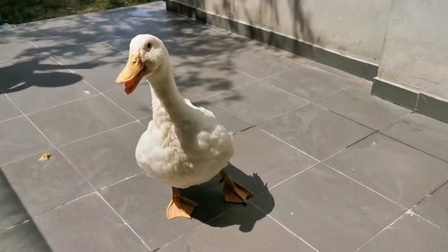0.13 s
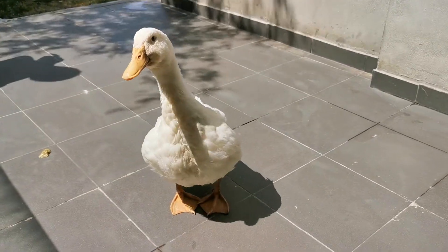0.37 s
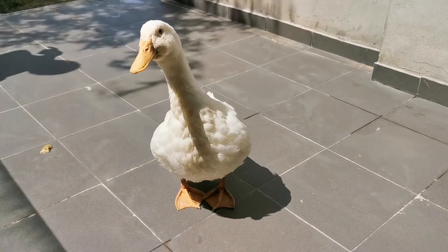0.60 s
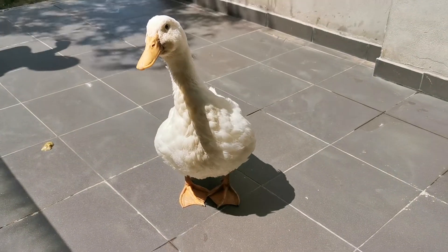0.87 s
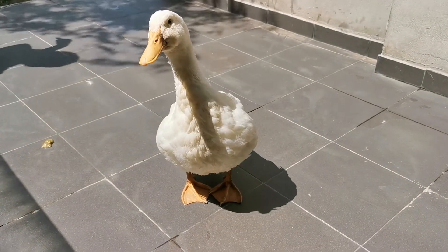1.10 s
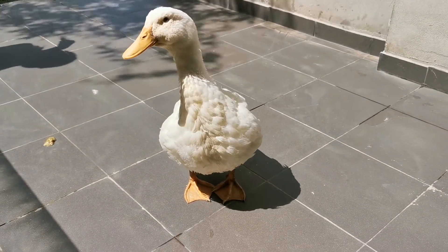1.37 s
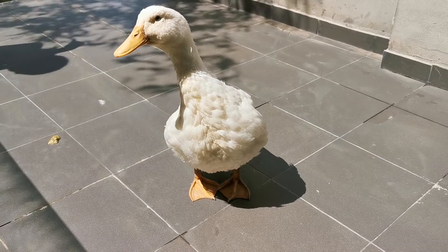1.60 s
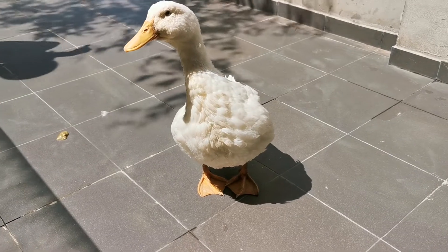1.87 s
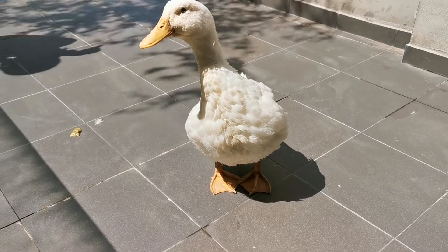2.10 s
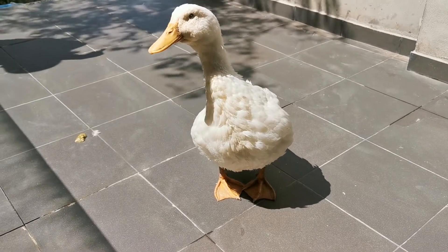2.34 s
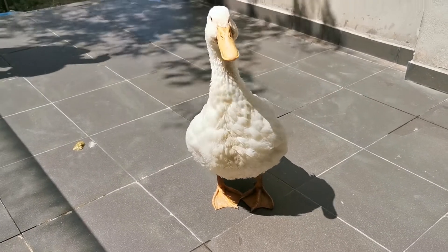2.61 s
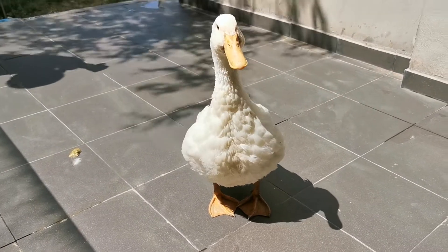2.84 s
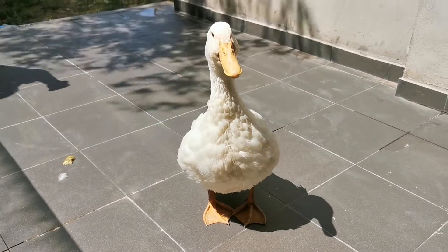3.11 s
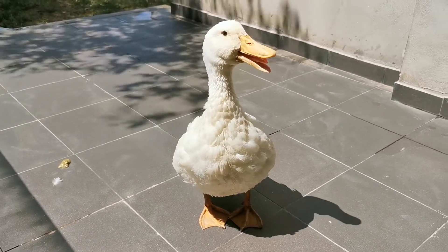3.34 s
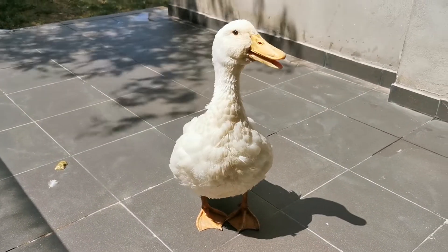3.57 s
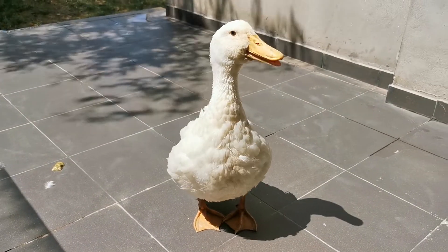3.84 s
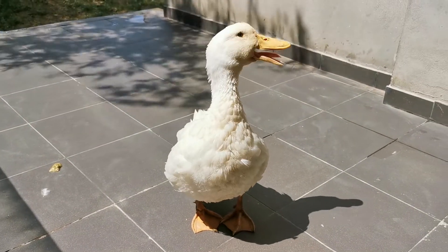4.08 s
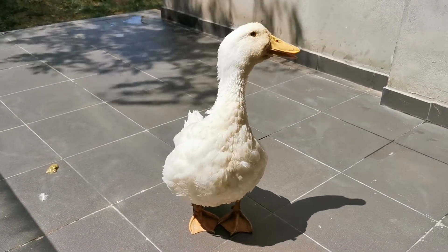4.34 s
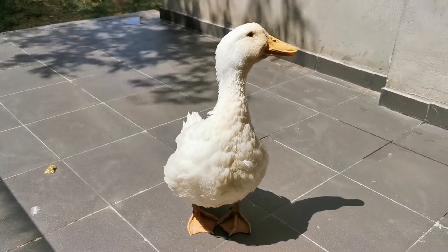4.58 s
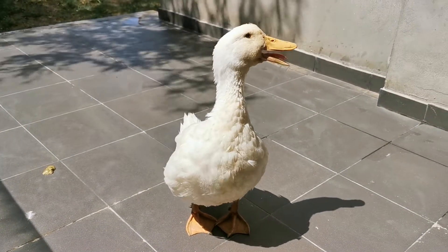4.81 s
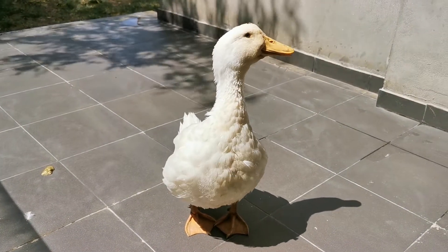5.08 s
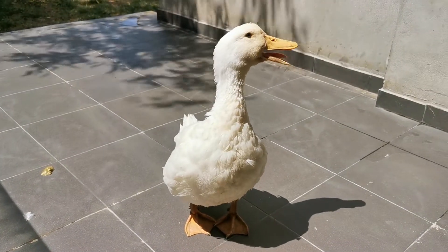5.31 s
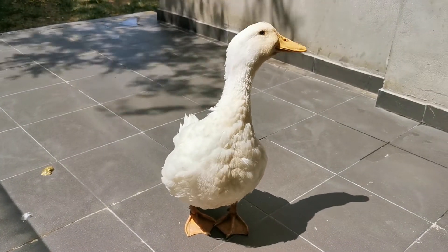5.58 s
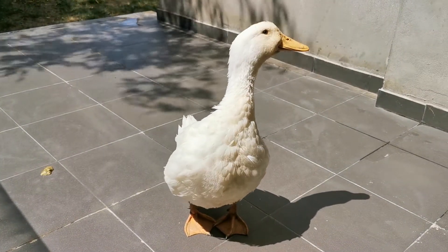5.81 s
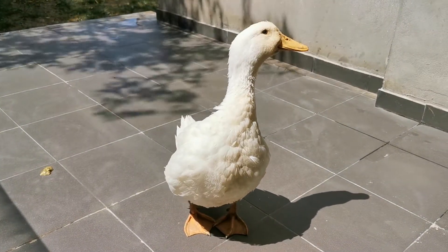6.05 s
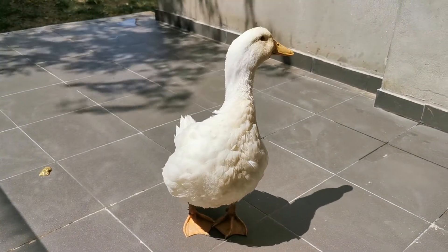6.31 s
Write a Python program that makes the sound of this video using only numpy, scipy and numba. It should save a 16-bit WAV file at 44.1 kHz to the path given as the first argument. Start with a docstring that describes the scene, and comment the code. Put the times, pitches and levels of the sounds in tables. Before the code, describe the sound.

Close on a sunny tiled terrace, a duck gives one loud, buzzy quack at once. Soft leaf hiss and a few dry ticks follow for about three seconds. Then a weak quack, squeaky indrawn whistles and a series of strong nasal quacks come at uneven short gaps, ringing briefly off tiles and wall. Leaves and a low gust swell late. Stereo handheld microphone a step or two away.

```python
"""Wind nudges the two ports of a phone on a tiled terrace as a duck, a step or two off, quacks once.
Leaves hiss and dry leaves tick; from 3.2 s come more quacks and grunts, buzzing snaps of the syrinx ringing
throat, bill and windpipe, most sliding up in pitch. Between some, indrawn air squeaks on two coupled whistles,
a soft hum under the third. From about 4.4 s leaves, then a gust, swell, easing near the end; both are shaped noise.
Tiles and walls echo the duck throughout, as delayed copies and a fading noise tail."""
import sys
import numpy as np
from scipy import signal
from scipy.fft import rfft, irfft, next_fast_len
from scipy.io import wavfile
from scipy.ndimage import uniform_filter1d
from numba import njit

SR = 44100
rng = np.random.default_rng(int(sys.argv[2]) if len(sys.argv) > 2 else 0)


def generate_wav(sig):
    """Save sig (samples, or channels by samples) to the path in sys.argv[1] as 16-bit PCM at SR."""
    pcm = np.round(np.clip(np.atleast_2d(sig).T, -1, 1) * 32767).astype(np.int16)
    wavfile.write(sys.argv[1], SR, pcm)


def gain_from_db(level_db):
    """Turn a decibel level (scalar or array-like) into a linear amplitude factor."""
    decades = np.asarray(level_db, float) / 20
    return 10 ** decades


N = 283563
T = np.arange(N) / SR  # s
SIZE = next_fast_len(N + SR)
HZ = np.arange(SIZE // 2 + 1) * SR / SIZE

# Quacks: (grunt start [s], bill opening [s], voice stop [s], top pitch before the creep [Hz], open bill level [dB])
QUACK_CALLS = [ (.04, .066, 0.17, 209.1, -10.5), (3.152, 3.174, 3.232, 168, -19),
               (3.505, 3.51, 3.524, 207.8, -30.5), (3.609, 3.648, 3.7534, 216.5, -11.5),
               (3.928, 3.961, 4.085, 220.2, -9.5), (4.446, 4.475, 4.603, 213.2, -13.5),
               (4.803, 4.82, 4.952, 214.6, -12.5), (5.196, 5.223, 5.336, 211.1, -13.5),
               (5.506, 5.512, 5.524, 172, -36)]
# Leading grunt: (pitch before the creep [Hz], level re open bill [dB], chest tone at its end re open chest
# level [dB])
QUACK_GRUNTS = [(166, -10, 4.5), (156.6, -14.5, -1.5), (203, -1, -18), (172, -18, -18), (168, -19, -8),
                (160.8, -13.5, -4), (161.6, -15, -4), (155.2, -16, -5), (164, 1, -12)]
# Open-bill voice: (roughness [0-1], strong-weak beat [dB], bill resonance at opening [Hz], its width [Hz])
QUACK_VOICES = [(.28, 2, 1280, 200), (.4, 2, 1160, 320), (.9, 2, 1250, 450), (.4, 7, 1200, 190),
                (.4, 9, 1205, 170), (.18, 3, 1225, 200), (.16, 1, 1240, 200), (.15, 1, 1230, 190),
                (.9, 2, 1250, 500)]
# Bill widening: (pitch rise time constant [s], bill ring change by the end [dB],
# gape at opening re effort [dB], gape at the end re effort [dB], open throat level [dB])
BILL_WIDENING = [(.012, -15, -1.5, -11.5, -28), (.02, -4.5, -22, -22, -27), (.01, 4, -14, -9, -28.5),
                 (.006, -6.5, -14, -9, -25), (.008, -14.5, -15, -13, -26.5),
                 (.022, -7.5, -10.5, -2.5, -23.5), (.02, -10, -9.5, -0.5, -22.5), (.02, -3, -8.5, -6, -23),
                 (0.0085, 5, -13, -10, -26.5)]
# Head direction: (left port lag [ms], nostril treble, 3 dB taken off later [dB])
HEAD_FACING = [(0.074, 3.5), (0.036, -3), (.026, -1), (0.035, 1), (0.017, -0.5), (0.012, 0.5), (0.028, 1),
               (.013, 1.5), (.01, 7)]
# Resonances of throat, windpipe, nostrils, gape: (centre [Hz], width [Hz], level [dB])
THROAT_MODES = [(464.6, 186, 9), (619, 384, 3.5), (990, 105, -14)]
WINDPIPE_MODES = [(1593, 300, 1.5), (2000, 130, -8), (2234, 320, 3.5), (3220, 660, -4)]
NOSTRIL_MODES = [(3750, 330, -2), (4270, 670, -2), (4920, 750, -3.5), (6590, 1440, -5), (11700, 3000, 2)]
GAPE_MODES = [(1510, 210, 0)]
# High voice of the squeaks: (start [s], pitch drop [s], stop [s], settled pitch [Hz], settled level [dB])
SQUEAK_HIGH = [ (3.245, 3.277, 3.38, 1493, -18.5), (3.39, 3.423, 3.468, 1708, -16.5),
               (4.14, 4.152, 4.258, 1737, -22), (5.385, 5.393, 5.495, 1699, -19.5)]
# Squeak entry: (pitch [Hz], level re settled [dB], air level [dB], pitch waver [share])
SQUEAK_ENTRY = [(1830, -13, -27, .008), (2110, -14.5, -23, 0.0098), (1957, -7, -21, .024),
                (2016, -15, -25, 0.0102)]
# Low voice of the squeaks: (joined [s], slide down [s], fade start [s], pitch before slide [Hz], level [dB])
SQUEAK_LOW = [(3.3, 3.366, 3.36, 991.7, -33.5), (3.444, 3.497, 3.54, 1033, -34),
              (4.17, 4.23, 4.268, 1066, -33.5), (5.425, 5.49, 5.475, 1058, -33)]
# Tones of the coupled voices: (multiple of low [1], multiple of high [1], level re the voices [dB])
COUPLED_TONES = [(1, 0, 3), (2, 0, 3.5), (3, 0, -4.5), (4, 0, -10), (5, 0, -6.5), (0, 1, -0.5),
                 (0, 2, -10.5), (0, 3, -21.5), (-1, 2, -9), (1, 1, -14), (1, 2, -10), (-2, 2, -8.5),
                 (-1, 1, -29)]
# First echoes, before the yard colour: (left delay [ms], right delay [ms], level [dB])
FIRST_ECHOES = [(1.5, 1.6, -13), (2.75, 3.1, -13.5), (5.2, 4.9, -8), (8.3, 9.4, -11), (12.1, 15, -14.5)]
# Colour of what the walls send back: (frequency [Hz], level [dB])
YARD_COLOUR = [(150, -15), (500, -6.5), (1100, 4.5), (1600, 8), (3000, -1), (7000, 4.5), (15000, -16)]
# Port response to the duck: (frequency [Hz], level [dB])
PORT_RESPONSE = [(5500, -4), (7000, -11.5), (7600, -23.5), (9300, -26), (10500, -18)]
# Outdoor levels before flicker: (time [s], leaves [dB], gust roar [dB], wind on the ports [dB])
AIR_LEVELS = [(0, -49, -51.5, -38), (.12, -57.5, -45.5, -51), (.36, -50, -59, -59.5),
              (.9, -49.5, -59.5, -58), (1.6, -51, -60.5, -61), (2.3, -53, -59.5, -58.5),
              (3.1, -51, -57.5, -62), (4.4, -44, -50, -62), (5.12, -46.5, -41, -53), (5.6, -46.5, -42, -51),
              (5.85, -44.5, -40.5, -47), (6.15, -47, -45, -51.5), (6.43, -47.5, -49.5, -50.5)]
# Relative spectra of wind, roar, leaves: (frequency [Hz], density [dB per Hz])
WIND_SPECTRUM = [(12, -27), (20, 4), (38, -2), (59, -17.5), (223, -18.5), (250, -14.5), (320, -43),
                 (550, -120)]
ROAR_SPECTRUM = [(35, -39), (60, -7), (107, -4), (242, -10.5), (313, -7), (383, -15), (650, -10),
                 (944, -11.5), (1630, -13.5), (3500, -28), (4550, -52), (7700, -120)]
LEAF_SPECTRUM = [(880, -28), (1500, -8.5), (2290, 3.5), (3320, -1), (6650, 4), (7700, -6.5), (9930, -0.5),
                 (10900, 6), (12900, 1.5), (14300, -5), (15600, -2)]
# Dry leaf ticks: (time [s], approximate peak [dB])
LEAF_TICKS = [(0.371, -36), (1.8194, -43), (1.9592, -44)]
# Port balance: (frequency [Hz], left minus right [dB])
PORT_BALANCE = [(60, 2.5), (110, 2.0), (200, 0.0), (380, -2.0), (700, -3.5), (1290, -3.5), (2380, -6.0),
                (4400, -4.0), (8120, -8.0), (15000, -15.0)]

ONSET_S, SILENT_DB = .001, -34
BILL_OPENING_S, PITCH_LEAD_S = .012, .004
GRUNT_ROUGHNESS, GRUNT_WIDTH_HZ, GRUNT_SWELL_DB = .7, 450, 5
CHEST_DB, CHEST_START_DB, THROAT_SHUT_DB = -23.5, -11.5, -2  # the last two relative to the open chest and open throat levels
RASP_DB, RASP_SHUT_DB, RASP_GROWTH_DB = -4.5, -1.5, 2  # relative to the effort
STOP_DB_PER_S, RASP_STOP_DB_PER_S = 900, 391
CLIMB_HZ, PITCH_WAVER_SHARE, BILL_RISE_HZ = 5, .008, 45
FADE_POWER, FLUTTER_DB = 1.9, 2
DROP_S, SWELL_S, AIR_SWELL_S, FADE_DB_PER_S = .022, .02, .04, 598
CATCH_SHARE, CATCH_S, CATCH_DB = .6, .007, -6.5  # share of the time from drop to stop
TIRE_DB, LOW_EDGE_S, SLIDE_S, SLIDE_SHARE = -3.5, .0065, .016, .36
HUM_START_S, HUM_STOP_S, HUM_EDGE_S, HUM_HZ, HUM_DB = 4.185, 4.262, .03, 318, -30.5
YARD_T60_S, YARD_DB = .43, -12.5
PORT_GAP_M = .16


def shape(points):
    """Gain of a (Hz, dB) table on the frequency grid."""
    hz, db = np.transpose(points)
    return gain_from_db(np.interp(np.log(HZ + 1), np.log(hz + 1), db))


def colour(x, gain):
    """Filter by a gain per frequency."""
    return irfft(rfft(x, SIZE) * gain, SIZE)[..., :N]


def unit(x):
    """Scale to rms 1."""
    return x / np.sqrt(np.mean(x ** 2))


def ramp(start_s, length_s):
    """0 before start_s, rising linearly to 1 over length_s."""
    return np.clip((T - start_s) / length_s, 0, 1)


def rows(*tables):
    """Columns over time: each moment reads the row of the call begun last."""
    starts_s = np.array(tables[0])[:, 0]
    call = np.clip(np.searchsorted(starts_s, T) - 1, 0, None)
    return [np.array(table, float)[call].T for table in tables]


def walk(rate_hz):
    """Random levels held 1 / rate_hz and slewed twice; spread near 1."""
    hold = int(SR / rate_hz)
    steps = np.repeat(rng.standard_normal(N // hold + 1), hold)[:N]
    return 1.3 * uniform_filter1d(uniform_filter1d(steps, hold), hold)


def sine(cycles):
    """Sine of rms 1 from a phase in cycles."""
    return np.sqrt(2) * np.sin(2 * np.pi * cycles)


@njit
def svf(x, hz, width_hz):
    """State-variable band-pass whose centre may move."""
    y, band, low = np.empty(len(x)), 0., 0.
    for i in range(len(x)):
        g, k = np.tan(np.pi * hz[i] / SR), width_hz[i] / hz[i]
        v = (band + g * (x[i] - low)) / (1 + g * (g + k))
        band, low, y[i] = 2 * v - band, low + 2 * g * v, k * v
    return y


def modes(x, table):
    """Fixed resonances side by side, each applied twice (once wider) for dark valleys; rms 1."""
    gain = 0
    for k, (hz, width_hz, db) in enumerate(table):
        detune = 1j * (HZ - hz ** 2 / (HZ + 1)) / width_hz
        gain = gain + (-1) ** k * gain_from_db(db) / (1 + detune) / (1 + detune / 2)
    return unit(colour(x, gain))


def diffuse(gain):
    """Noise from all sides: alike at both ports in the bass, nearly unrelated above."""
    alike = np.sinc(2 * HZ * PORT_GAP_M / 343)  # speed of sound in m/s
    mid, side = rng.standard_normal((2, N))
    mid = colour(mid, gain * np.sqrt(1 + alike))
    side = colour(side, gain * np.sqrt(1 - alike))
    return unit(np.array([mid + side, mid - side]))


def quacks():
    """The syrinx snaps once a cycle, with a puff of air, into throat, bill and windpipe; the chest hums the pitch."""
    call, grunt, voice, widening, facing = rows(QUACK_CALLS, QUACK_GRUNTS, QUACK_VOICES, BILL_WIDENING, HEAD_FACING)
    start_s, opens_s, stop_s, top_hz, full_db = call
    grunt_hz, grunt_db, hum_db = grunt
    roughness, beat_db, bill_hz, bill_width_hz = voice
    rise_s, fade_db, first_db, last_db, throat_db = widening
    lag_ms, treble_db = facing

    shut = 1 - ramp(opens_s, BILL_OPENING_S)
    wide = ramp(opens_s, stop_s - opens_s)
    after_s = np.maximum(T - stop_s, 0)
    roughness = roughness + shut * (GRUNT_ROUGHNESS - roughness)
    beat_db = beat_db * (1 - shut)
    bill_width_hz = bill_width_hz + shut * (GRUNT_WIDTH_HZ - bill_width_hz)
    bill_hz = bill_hz + BILL_RISE_HZ * wide

    rise = np.exp(-np.maximum(T - opens_s + PITCH_LEAD_S, 0) / rise_s)
    hz = top_hz + (grunt_hz - top_hz) * rise + CLIMB_HZ * (wide - .5)
    jitter = .03 * roughness * walk(250) + PITCH_WAVER_SHARE * walk(40)
    turns = np.cumsum(hz * (1 + jitter)) / SR
    turns = turns + 1 - np.interp(start_s, T, turns) % 1  # every call begins with a snap
    cycle = turns.astype(int)
    scatter = rng.standard_normal(N)[cycle]
    strength = gain_from_db(beat_db / 2 * (-1.) ** cycle + 7.3 * roughness * scatter)
    snap = unit(np.exp(-(turns % 1) / .013))
    puff = unit(np.exp(-(turns % 1) / 1.23) * rng.standard_normal(N))
    clear = strength * (snap + .6 * roughness * puff)
    hoarse = np.sqrt(strength) * (.4 * snap + puff)

    ring = svf(svf(clear, bill_hz, bill_width_hz), bill_hz, 1.43 * bill_width_hz)
    bill = gain_from_db(fade_db * wide ** FADE_POWER) * unit(ring / np.sqrt(bill_width_hz))
    gape = gain_from_db(first_db + (last_db - first_db) * wide) * modes(clear, GAPE_MODES)
    rasp = gain_from_db(-5.5) * modes(hoarse, WINDPIPE_MODES) + gain_from_db(treble_db - 3) * modes(hoarse, NOSTRIL_MODES)

    pressing = ramp(start_s, opens_s - start_s)
    swell_db = CHEST_START_DB + (hum_db - CHEST_START_DB) * pressing
    effort_db = full_db + shut * (grunt_db + GRUNT_SWELL_DB * (pressing - 1))
    throat_db = throat_db + shut * (THROAT_SHUT_DB + swell_db) + FLUTTER_DB * walk(70)
    chest_db = CHEST_DB + shut * swell_db + FLUTTER_DB / 2 * walk(50)
    rasp_db = effort_db + RASP_DB + shut * (RASP_SHUT_DB + swell_db / 2) + RASP_GROWTH_DB * wide
    rasp_db = rasp_db - RASP_STOP_DB_PER_S * after_s
    voiced = gain_from_db(effort_db) * (bill + gape)
    voiced = voiced + gain_from_db(throat_db) * modes(clear, THROAT_MODES) + gain_from_db(chest_db) * sine(turns)
    duck = gain_from_db(-STOP_DB_PER_S * after_s) * voiced + gain_from_db(rasp_db) * rasp
    return ramp(start_s, ONSET_S) * duck, lag_ms


def squeaks():
    """Both halves of the syrinx whistle on their own pitch and mix into sum and difference tones; air hisses along."""
    high_voice, entry, low_voice = rows(SQUEAK_HIGH, SQUEAK_ENTRY, SQUEAK_LOW)
    start_s, drop_s, stop_s, held_hz, held_db = high_voice
    entry_hz, entry_db, air_db, waver_share = entry
    joins_s, slides_s, leaves_s, low_hz, low_db = low_voice

    dropped = np.sin(np.pi / 2 * ramp(drop_s, DROP_S)) ** 2
    fade_db = -FADE_DB_PER_S * np.maximum(T - stop_s, 0)
    catch_s = drop_s + CATCH_SHARE * (stop_s - drop_s)  # the high voice catches midway
    catch_db = CATCH_DB * np.exp(-((T - catch_s) / CATCH_S) ** 2)
    high_hz = entry_hz + (held_hz - entry_hz) * dropped
    high_db = held_db + entry_db * (1 - dropped) + SILENT_DB / 2 * (1 - ramp(start_s, SWELL_S))
    high_db = high_db + catch_db + fade_db + TIRE_DB * ramp(drop_s + DROP_S, stop_s - drop_s - DROP_S)
    low_absent = 1 - ramp(joins_s - LOW_EDGE_S, LOW_EDGE_S) + ramp(leaves_s, 2 * LOW_EDGE_S)
    low_db = low_db + SILENT_DB * low_absent - FADE_DB_PER_S * np.maximum(T - leaves_s, 0)
    low_hz = low_hz * (1 - SLIDE_SHARE * ramp(slides_s, SLIDE_S))
    air_db = air_db + SILENT_DB / 2 * (1 - ramp(drop_s, AIR_SWELL_S)) + fade_db

    low_turns = np.cumsum(low_hz * (1 + waver_share * walk(150))) / SR
    high_turns = np.cumsum(high_hz * (1 + waver_share * walk(250))) / SR
    tones = 0
    for m, n, db in COUPLED_TONES:
        level_db = db + (abs(m) * low_db + n * high_db) / (abs(m) + n) + 3 * walk(90)
        tones = tones + gain_from_db(level_db) * sine(m * low_turns + n * high_turns)

    noise = rng.standard_normal(N)
    # turbulence rings the same cavity as the high voice, and its octave
    wheeze = unit(svf(noise, high_hz, .15 * high_hz))
    wheeze = wheeze + gain_from_db(-.5) * unit(svf(noise, 2 * high_hz, .38 * high_hz))
    air = gain_from_db(air_db + 3 * walk(60)) * modes(noise, WINDPIPE_MODES + NOSTRIL_MODES)
    air = air + gain_from_db(high_db - 12) * wheeze
    humming = ramp(HUM_START_S, HUM_EDGE_S) * (1 - ramp(HUM_STOP_S - HUM_EDGE_S, HUM_EDGE_S))
    hum = humming * gain_from_db(HUM_DB) * sine(HUM_HZ * T)
    return ramp(start_s, ONSET_S) * (tones + air) + hum


def terrace(duck, lag_ms):
    """Straight path, echoes off tiles and walls, then the fading wash of the yard."""
    left = np.interp(T - uniform_filter1d(lag_ms, size=400) / 1000, T, duck)
    echoes = 0
    for left_ms, right_ms, db in FIRST_ECHOES:
        delays_s = np.array([left_ms, right_ms]) / 1000
        echoes = echoes + gain_from_db(db) * np.exp(-2j * np.pi * np.outer(delays_s, HZ))
    tail = diffuse(shape(YARD_COLOUR)) * gain_from_db(-60 * T / YARD_T60_S) * (1 - np.exp(-T / .0097))
    # air and foliage swallow the treble sooner
    bright = colour(tail, HZ ** 2 / (HZ ** 2 + 2800 ** 2))
    tail = tail - bright * (1 - np.exp(-T / .091))
    tail = gain_from_db(YARD_DB) * tail / np.sqrt(np.sum(tail ** 2) / 2)
    reflected = colour(duck, shape(YARD_COLOUR) * echoes + rfft(tail, SIZE))
    return colour(np.array([left, duck]) + reflected, shape(PORT_RESPONSE))


def outdoors():
    """Wind thuds, gust roar and leaf hiss are shaped noises flickering alone; ticks are short decays of leaf noise."""
    time_s, *levels_db = np.transpose(AIR_LEVELS)
    leaves_db, roar_db, wind_db = (np.interp(T, time_s, db) for db in levels_db)
    # part of the wind buffets each port on its own
    buffets = unit(colour(rng.standard_normal((2, N)), shape(WIND_SPECTRUM)))
    wind = gain_from_db(wind_db + 3.9 * walk(7.5)) * (diffuse(shape(WIND_SPECTRUM)) + .61 * buffets)
    roar = gain_from_db(roar_db + 2.1 * walk(5.2)) * diffuse(shape(ROAR_SPECTRUM))
    ticks = 0
    for tick_s, peak_db in LEAF_TICKS:
        decay = (T > tick_s) * np.exp(-np.abs(T - tick_s) / .012)
        ticks = ticks + gain_from_db(peak_db) * decay / 3  # noise peaks near 3 times its rms
    leaves = (gain_from_db(leaves_db + .51 * walk(8.7)) + ticks) * diffuse(shape(LEAF_SPECTRUM))
    return wind + roar + leaves


def scene():
    """Duck in its terrace over the outdoor air."""
    quack, lag_ms = quacks()
    return terrace(quack + squeaks(), lag_ms) + outdoors()


def low_pass(x):
    """Removes everything above the highest recorded frequency."""
    return signal.sosfilt(signal.butter(12, 15740, fs=SR, output="sos"), x)


def record(dry):
    """The left port is shaded in the treble; peaks beyond 0.97 clip."""
    tilt = np.sqrt(shape(PORT_BALANCE))
    port_gains = np.array([tilt, 1 / tilt]) * 2 / (tilt + 1 / tilt)
    mix = np.clip(colour(dry, port_gains), -.97, .97)
    return low_pass(mix)


dry = scene()
out = record(dry)
generate_wav(out)
```